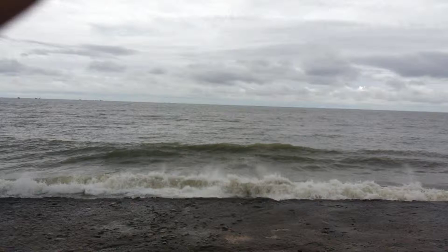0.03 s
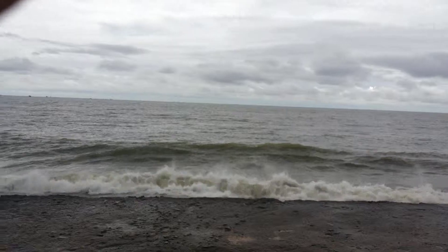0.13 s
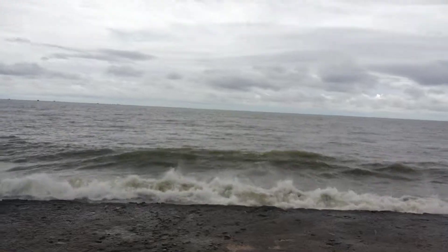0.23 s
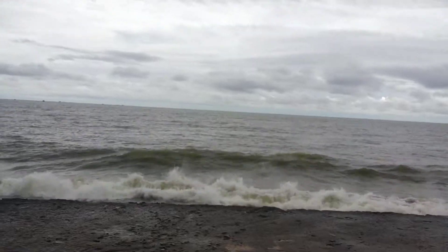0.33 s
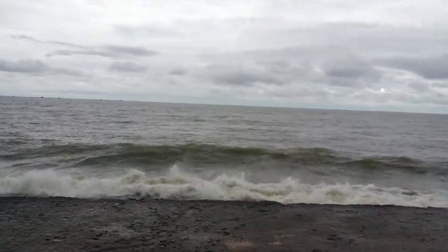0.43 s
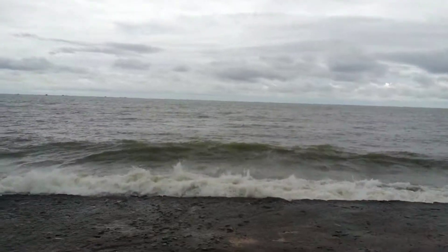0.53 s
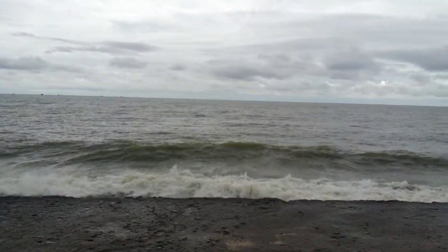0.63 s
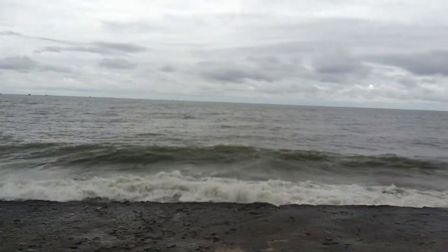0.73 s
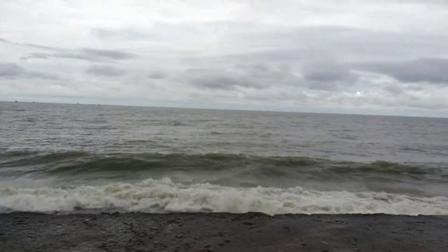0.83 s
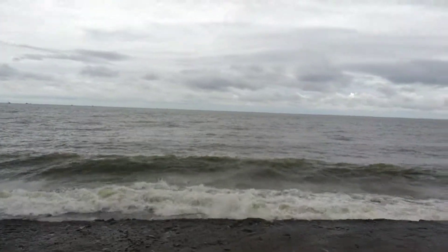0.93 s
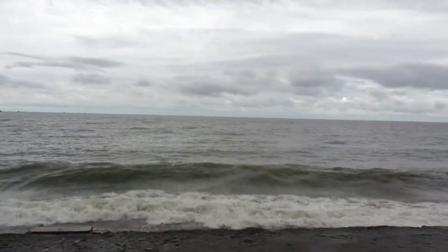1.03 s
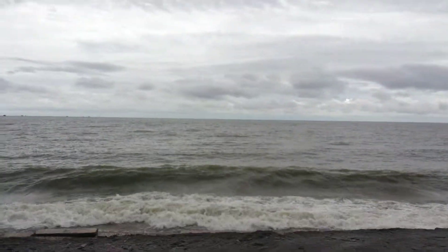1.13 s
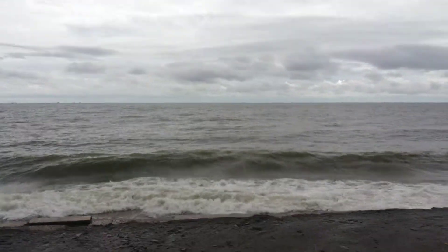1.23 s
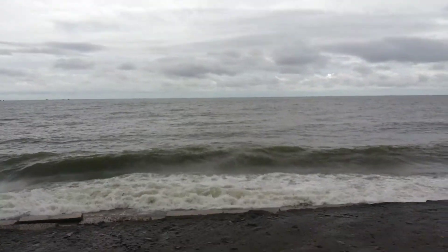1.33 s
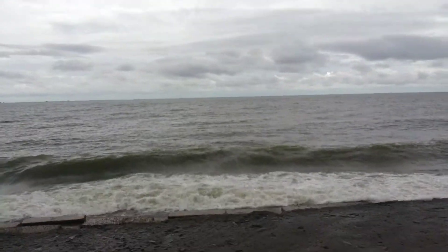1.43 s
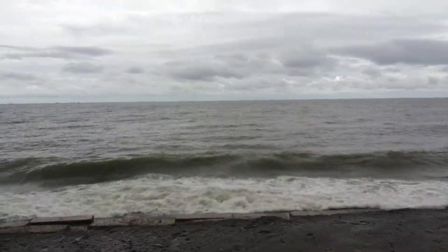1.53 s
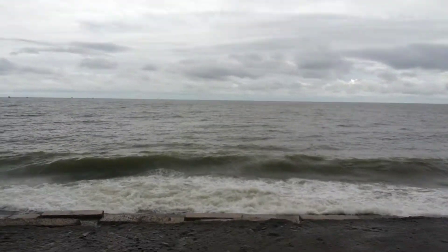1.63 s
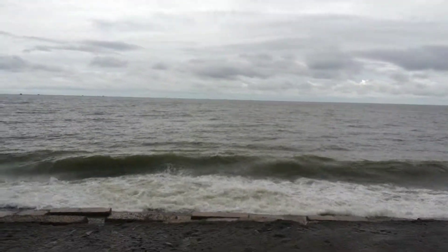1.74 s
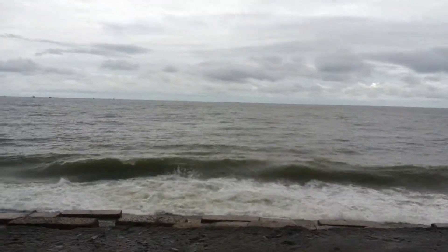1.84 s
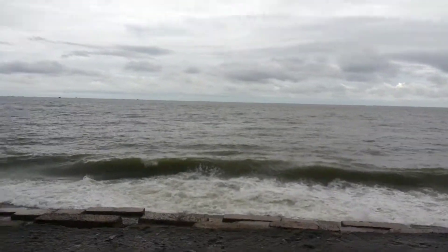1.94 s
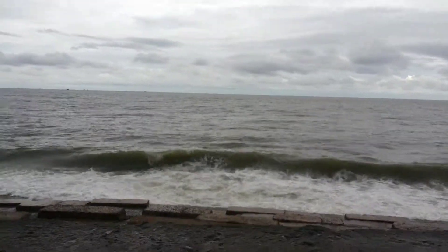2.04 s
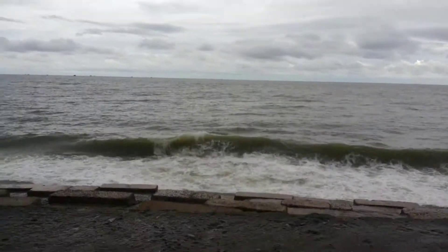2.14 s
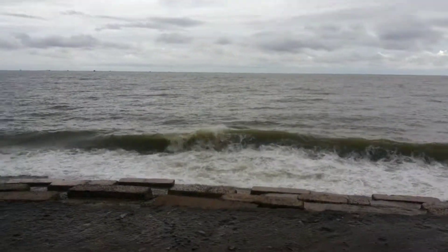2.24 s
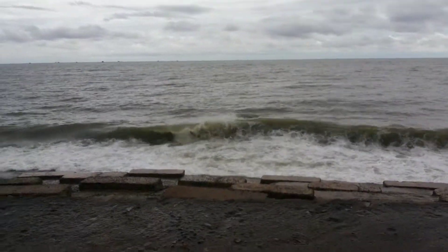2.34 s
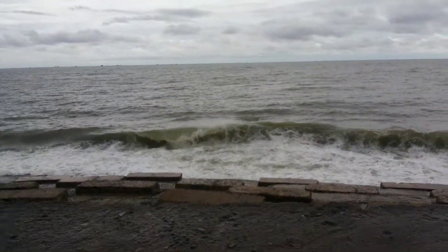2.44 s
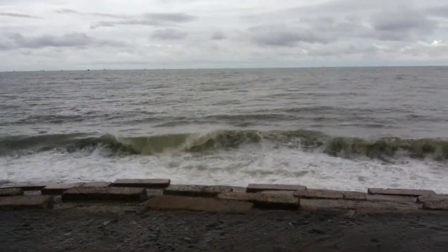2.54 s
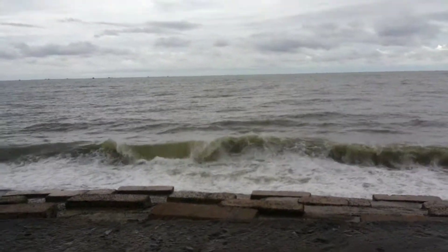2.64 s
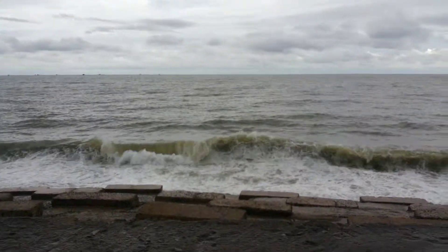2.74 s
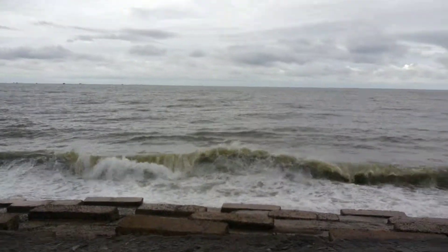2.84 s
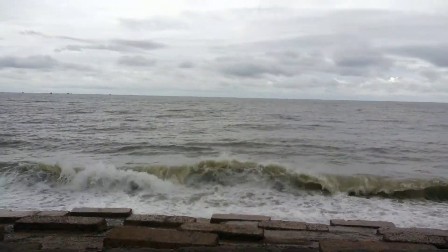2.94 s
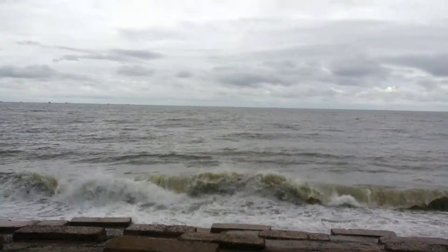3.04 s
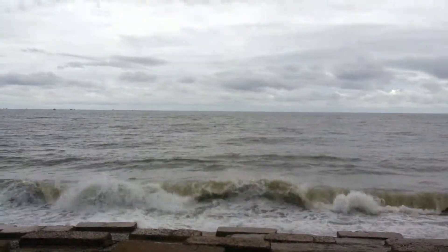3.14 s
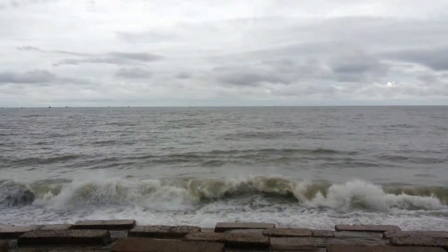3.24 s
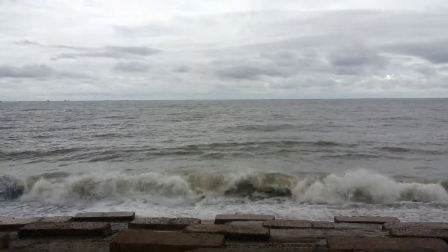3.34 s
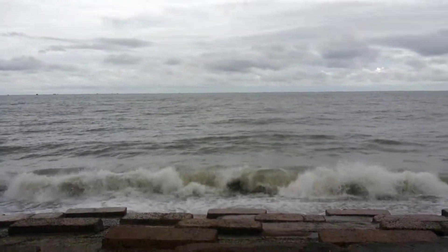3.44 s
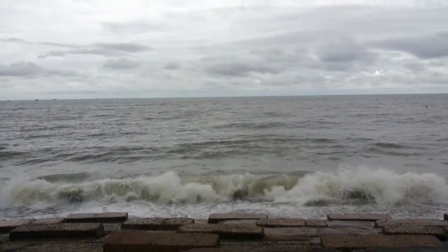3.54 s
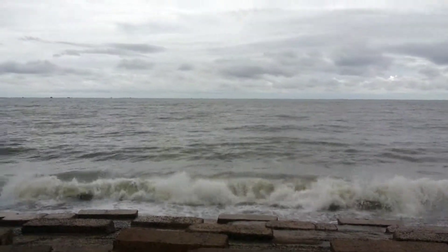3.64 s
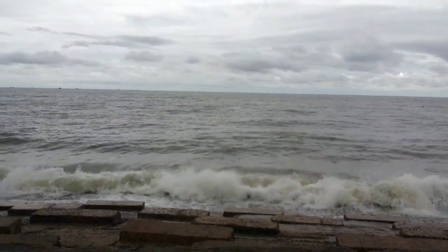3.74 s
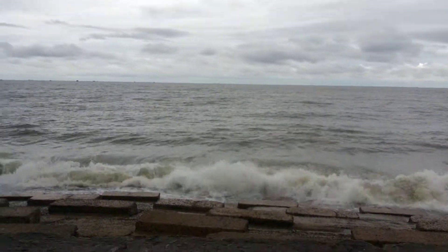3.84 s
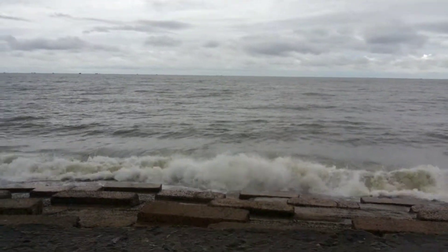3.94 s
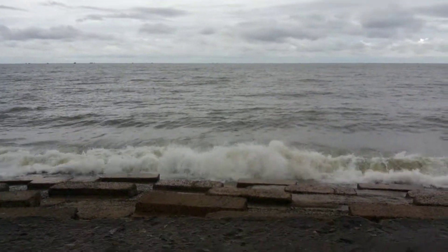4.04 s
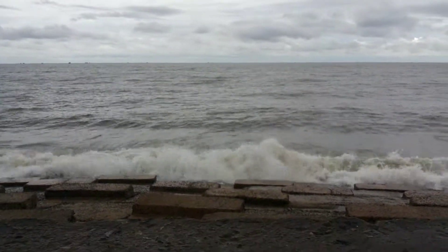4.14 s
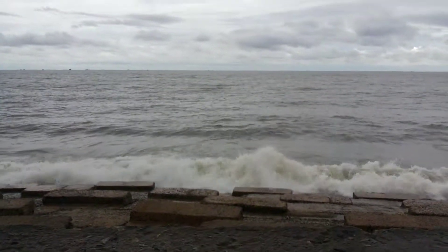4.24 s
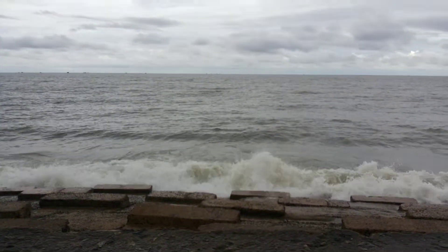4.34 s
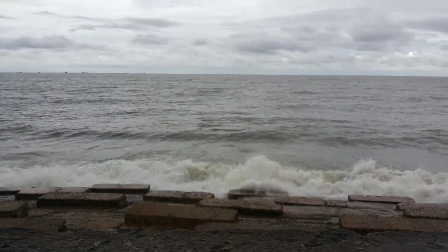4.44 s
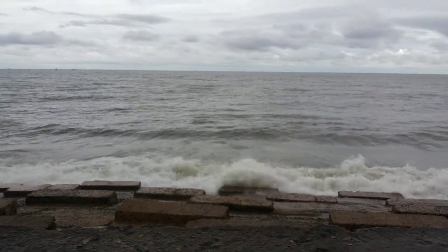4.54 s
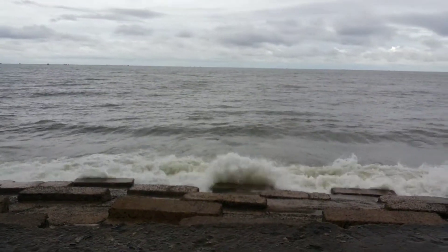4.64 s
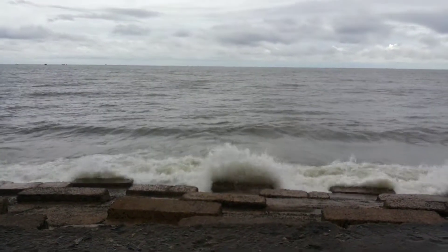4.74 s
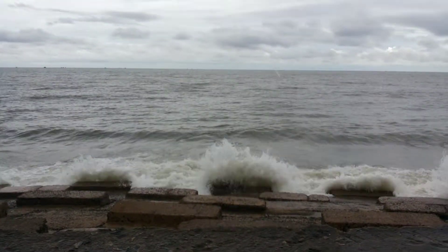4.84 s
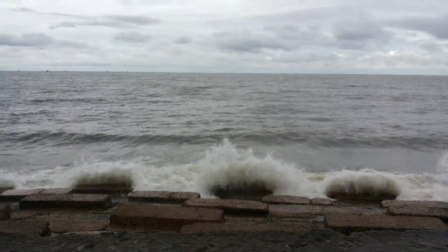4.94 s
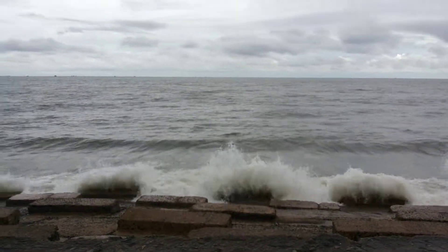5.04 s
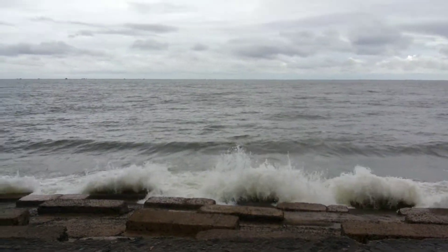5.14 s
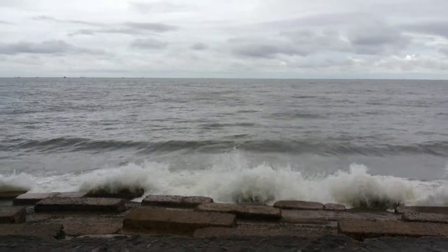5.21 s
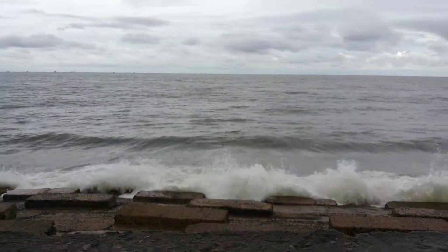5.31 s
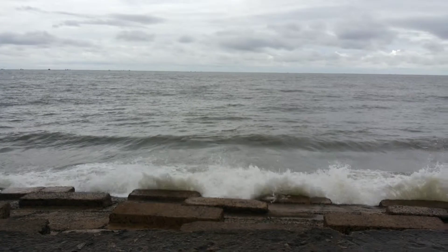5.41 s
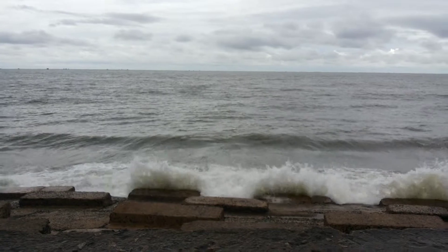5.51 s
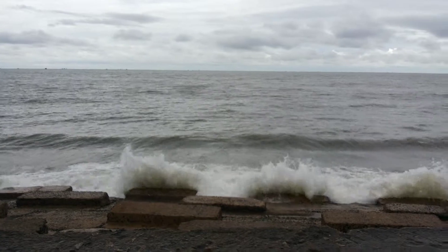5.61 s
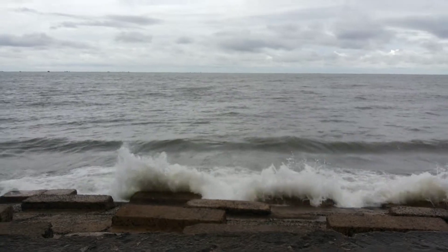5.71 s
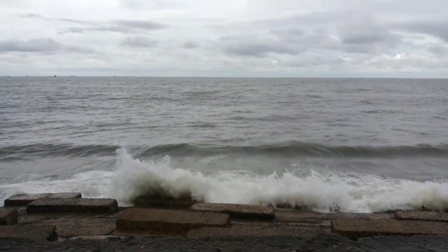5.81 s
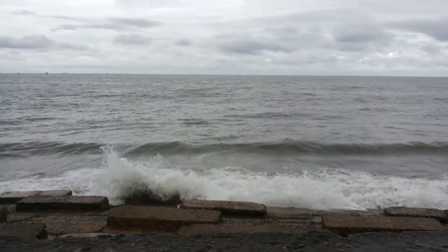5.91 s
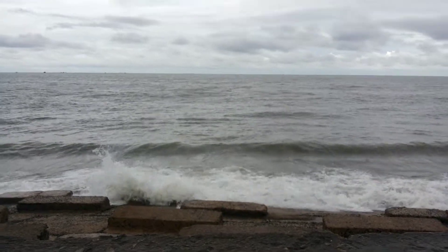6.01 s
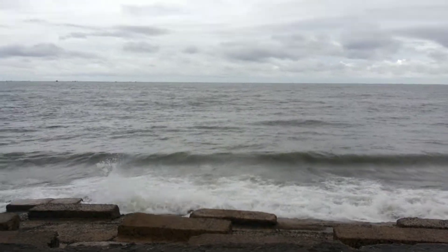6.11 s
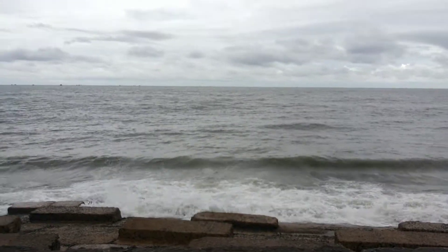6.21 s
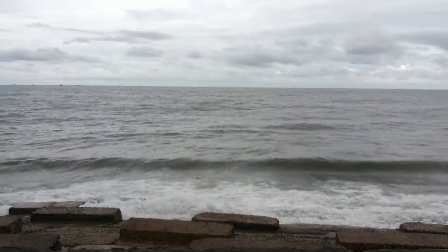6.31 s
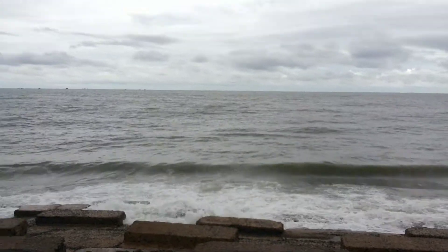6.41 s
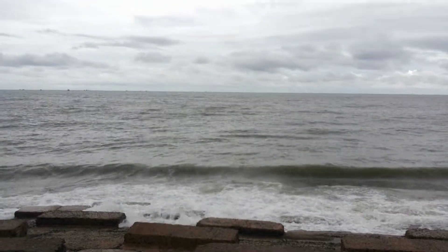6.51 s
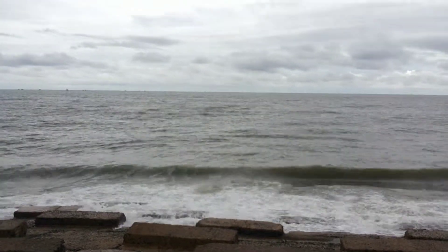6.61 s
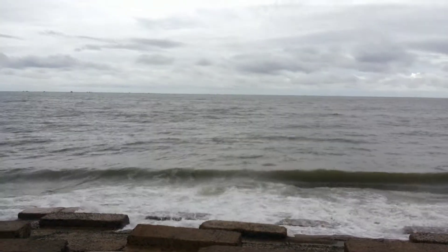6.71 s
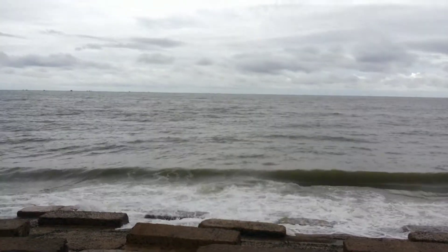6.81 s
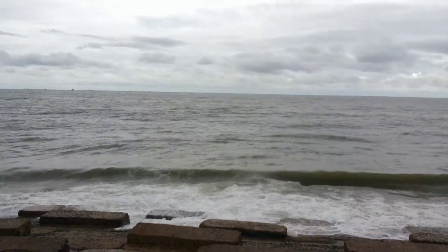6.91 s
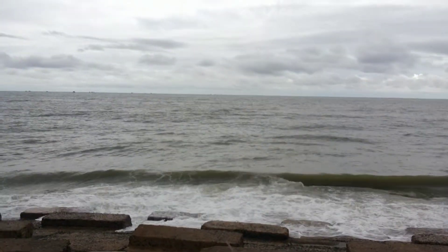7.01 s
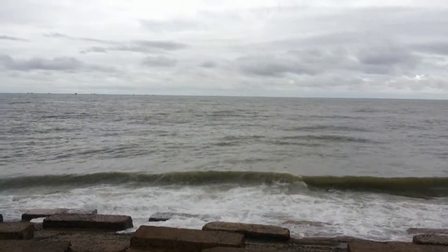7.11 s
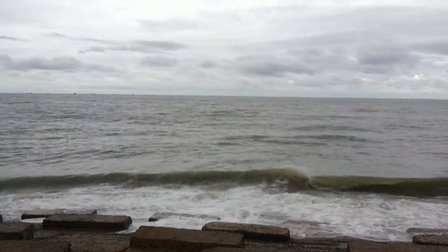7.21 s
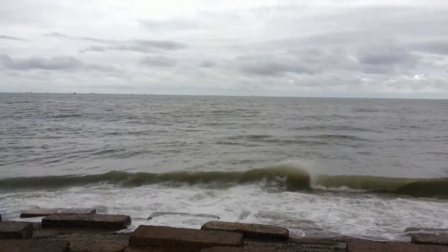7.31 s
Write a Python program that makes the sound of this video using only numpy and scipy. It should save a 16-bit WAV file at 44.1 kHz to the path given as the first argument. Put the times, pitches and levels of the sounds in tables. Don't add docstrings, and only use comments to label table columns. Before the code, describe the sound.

Waves break in foamy washes on stones, wind buffets the microphone with lumpy rumbles and overloaded pops, and a sole scrapes and slaps early on.

```python
import sys
import numpy as np
from scipy import signal
from scipy.fft import rfft, irfft, next_fast_len
from scipy.io import wavfile
from scipy.ndimage import uniform_filter1d, map_coordinates

SR = 44100
rng = np.random.default_rng(int(sys.argv[2]) if len(sys.argv) > 2 else 0)


def boost(x):
    u = np.asarray(x, float) / 20
    return 10 ** u


def transcribe(signal):
    frames = np.atleast_2d(signal).T
    limited = np.clip(frames, -1, 1)
    pcm = np.round(limited * 32767).astype(np.int16)
    wavfile.write(sys.argv[1], SR, pcm)


N = 324576

# t/s, wash level/dB, fizz over wash/dB
SEA = [(0.45, -26, -10.5), (0.9, -27, -6), (1.6, -29, -2.5), (2.3, -28.5, -0.5), (2.65, -29.5, -2.5),
       (3.0, -26, -6.5), (3.5, -22, -10), (4.0, -23, -8), (4.6, -23, -8), (5.0, -26.5, -7.5),
       (5.35, -28, -8.5), (5.8, -27.5, -8.5), (6.4, -28, -8.5), (6.8, -30, -5.5), (7.0, -31, -8.5),
       (7.36, -31, -8.5)]
# t/s, swell/dB, hold/s
SURGES = [(.7, 3.5, 0.083), (1.02, 2, 0.17), (2.3, 0.1, 0.036), (3.085, 3.5, 0.11), (3.3, 2.5, 0.07),
          (3.53, 3, 0.11), (3.77, 3.5, 0.06), (4.05, 1, .14), (4.3, 0.5, 0.093), (4.6, 0.5, 0.11),
          (4.95, 1.5, 0.029), (5.39, 5, 0.23), (5.86, 2.5, 0.15), (6.15, 4.5, 0.052), (6.46, 1, 0.071),
          (6.66, 1, 0.095), (7.12, 0.5, .15)]
# f/Hz, density/dB
ROAR_SPECTRUM = [(40, -41), (100, -11), (200, -6.5), (400, -6.5), (700, -5.5), (1000, -8.5), (1400, -10),
                 (2600, -11.5), (3400, -51)]
# f/Hz, density/dB
WASH_SPECTRUM = [(760, -40), (1300, -3.5), (1920, -6.5), (2170, -2.5), (2570, -1), (2890, 0.5), (3130, -1),
                 (3470, -4), (5510, -14), (7500, -15.5), (9750, -32.5), (16500, -120)]
# f/Hz, density/dB
CREST_SPECTRUM = [(760, -48), (1300, -35), (1690, -7.5), (1970, -6.5), (2530, 1.5), (2790, 1), (4350, -2),
                  (4750, -10.5), (5800, -12), (7500, -15.5), (9750, -65), (16500, -120)]
# f/Hz, density/dB
SPRAY_SPECTRUM = [(2650, -31), (4500, -6), (4730, -2), (5780, -1.5), (7010, -5.5), (8470, -9.5), (9580, -9),
                  (12000, -19), (15600, -48), (22000, -120)]
# f/Hz, density/dB
MIST_SPECTRUM = [(9000, -22), (11000, -3.5), (13000, -9), (14500, -9), (15700, -13), (15900, -100)]
# t/s, level/dB
TURN = [(.5, -8), (1.4, -4), (2.6, -0.3)]

# middle t/s, peak level/dB, length/s
GUSTS = [(0.633, -28, .08), (0.774, -21, .16), (0.886, -22.5, 0.097), (1.09, -22, 0.23),
         (1.272, -25.5, 0.059), (1.49, -27.5, 0.078), (1.806, -17, 0.1), (1.886, -22.5, 0.046),
         (2.045, -21.5, 0.22), (2.342, -28, 0.045), (2.818, -24, 0.13), (3.15, -27.5, 0.16),
         (3.296, -33.5, 0.16), (3.534, -21.5, 0.18), (3.68, -33, 0.27), (3.84, -27.5, 0.21),
         (4.092, -30, 0.33), (4.42, -19.5, .16), (4.682, -25.5, 0.48), (4.976, -22, 0.13),
         (5.553, -20, 0.11), (5.654, -19, 0.16), (5.75, -23, 0.11), (5.915, -18, 0.077), (6.014, -11, 0.14),
         (6.1, -21.5, 0.091), (6.248, -17, 0.21), (6.35, -29, .08), (6.611, -17, .24), (7.111, -28.5, 0.04)]
# f/Hz, density/dB
BUFFET_SPECTRUM = [(15, -56), (25, -18), (188, 3.5), (317, 1), (405, -3), (441, -4), (870, -20),
                   (1600, -21), (2080, -46), (3520, -120)]
# t/s, peak level/dB, pitch f/Hz, length/s
PUFFS = [(.8, -9.5, 325, 0.025), (1.097, -7, 250, 0.0064), (1.147, -13, 316, 0.012),
         (1.172, -14, 347.6, 0.015), (1.79, -14, 250, .035), (1.825, -7, 267, 0.029),
         (.727, -13.5, 301.5, 0.012), (1.987, -20, 263, 0.022), (2.029, -7.5, 296, 0.024),
         (2.103, -16.5, 250, 0.02), (2.33, -17.5, 228, 0.02), (2.774, -12.5, 429, 0.026),
         (3.38, -14, 395, 0.016), (3.509, -8.5, 286.5, 0.0098), (4.405, -12, 313, .008),
         (4.962, -17.5, 250, 0.04), (5.526, -7, 276, 0.011), (5.619, -10, 242, 0.018),
         (5.651, -11, 271, 0.013), (5.682, -10.5, 384.7, 0.045), (5.91, -14, 277.3, 0.087),
         (5.985, -4.5, 300.5, 0.048), (6.03, -7, 270, 0.04), (6.172, -10.5, 331, 0.049),
         (6.214, -8, 264.5, 0.012), (6.25, -11.5, 377, 0.057), (6.469, -13, 238, 0.018),
         (6.52, -13, 276.5, 0.035), (6.6, -20, 302, .035), (6.652, -12.5, 230, 0.024)]
# t/s, peak level/dB, width/s
POPS = [(0.728, -9, 0.00038), (0.789, -16, 0.00082), (1.774, -5, 0.0006), (1.822, -5, 0.00028),
        (2.021, -10, 0.00046), (2.728, -13, 0.0006), (3.476, -9.5, .0007), (5.515, -11, 0.00048),
        (5.621, -8.5, 0.00097), (5.682, -10, 0.00046), (5.923, -8, 0.00061), (5.972, -3, 0.00063),
        (5.989, 0, 0.00029), (6.002, -3, 0.00036), (6.043, 1.5, 0.00047), (6.173, -11, 0.00063),
        (6.217, -10, 0.00093), (6.236, -4, 0.00056), (6.257, 1, 0.00042), (6.274, -2, 0.00045),
        (6.59, -4.5, 0.00053)]

# t/s, scrape level/dB, hold/s, hollow over scrape/dB, fine grit over scrape/dB
RUBS = [
    (1.746, -19.5, 0.027, -20, -5.5),
    (1.8, -23, 0.068, -14, -8),
    (2.03, -25.5, .03, -20, -3),
    (2.065, -20, 0.0086, -19, -7.5),
    (2.115, -21, .02, -15, -10),
    (2.735, -20.5, 0.043, 0, -5.5),
    (2.795, -23.5, 0.061, 0.5, -11.5),
    (2.812, -30, 0.0061, -15, 3.5),
    (2.87, -29, 0.048, -8, -8),
]
# f/Hz, density/dB
GRIT_SPECTRUM = [(1060, -21), (1800, -8), (1900, -12), (2040, -10), (2790, 1.5), (3630, -4.5), (6000, -12),
                 (7800, -42), (13200, -120)]
# f/Hz, density/dB
FINE_SPECTRUM = [(4000, -25), (5500, -2), (7000, 0), (9500, -5), (12000, -19), (14500, -44)]
# f/Hz, width/Hz, level/dB
HOLLOW_MODES = [(671, 46, -2), (1390, 18, 0.5), (1663, 65, 1), (1840, 120, -2)]
# t/s, peak level/dB
SLAPS = [
    (2.736, -3),
]
# f/Hz, level/dB, delay/s, length/s
SOLE_MODES = [(766, 0, 0, 0.016), (1340, 0, 0.0056, 0.0097), (2030, -5, 0.013, 0.0095),
              (2810, -4, 0.012, 0.015), (3270, -12, 0.001, 0.014), (4630, -15, 0.01, .03)]

# f/Hz, width/Hz, level/dB
CASING_DIPS = [(1324, 165, -2.5), (4650, 210, -1), (8100, 330, 0), (11000, 370, -1)]
# t/s, low f/Hz, high f/Hz
STRAY_BANDS = [(.906, 9000, 10500), (.952, 4700, 7000), (.952, 8300, 11900), (1.207, 5200, 6400),
               (1.207, 9700, 11900), (3.251, 13200, 15700), (3.483, 4200, 5300), (3.483, 6900, 9100),
               (3.483, 10400, 11900), (4.319, 11800, 13300), (4.435, 6900, 8400), (4.435, 14500, 15700),
               (4.69, 4700, 5800), (4.69, 8300, 9800), (4.69, 13200, 15300), (5.085, 4200, 9100),
               (5.201, 12500, 14600), (5.433, 4700, 5800), (5.433, 12500, 13900), (5.457, 9700, 11200),
               (5.596, 4700, 5800), (5.596, 11100, 12600), (5.782, 8300, 11200), (5.782, 12500, 13900),
               (6.107, 14500, 15700), (6.618, 6900, 11200), (7.128, 5200, 6400), (7.128, 9000, 10500),
               (7.337, 4200, 8400), (7.337, 12500, 13900)]

SURGE_RISE_S, SURGE_FALL_S = 0.014, 0.14
ROAR_DB, MIST_DB = -2.5, -21.5
ROAR_DB_PER_SURGE_DB, FIZZ_DB_PER_SURGE_DB = 0.86, 0.95
CALM_DB, WIND_DB_PER_SEA_DB = -35, 0.55
GUST_EDGE_DB = 9.5
SHED_EVERY_S, SHED_DB, SHED_SPREAD_DB = 0.026, 1.5, 2.5
SHED_HZ, SHED_S = 250, 0.013
RUB_RISE_S, RUB_FALL_S = 0.0091, 0.042
START_S, TOP_HZ = 0.4355, 15750


def surf():
    sea_db, fizz_db = curves(SEA)
    swell_db = sum(db * held(s, hold_s, SURGE_RISE_S, SURGE_FALL_S) for s, db, hold_s in SURGES)
    wash_db = sea_db + swell_db
    unrest_db = 0.5 * wobble(12) + 0.29 * wobble(22)
    splashes = bursts(count=2500, life_s=0.0028, spread_db=0.5)
    breaking = np.clip((wash_db + 29.5) / 7, 0, 1)

    roar_db = sea_db + ROAR_DB + ROAR_DB_PER_SURGE_DB * swell_db + 1.2 * wobble(8.9)
    roar = boost(roar_db) * rush(ROAR_SPECTRUM, patchy_db=-0.3)
    sheet = np.sqrt(1 - breaking) * rush(WASH_SPECTRUM, patchy_db=1.5, grain=0.17 * splashes)
    crest = np.sqrt(breaking) * rush(CREST_SPECTRUM, patchy_db=1.3, grain=0.28 * splashes)
    spray_db = sea_db + fizz_db + FIZZ_DB_PER_SURGE_DB * swell_db
    spray = boost(spray_db) * rush(SPRAY_SPECTRUM, patchy_db=-1.0, grain=0.19 * splashes)
    mist_db = wash_db + MIST_DB + curves(TURN)[0]
    mist = boost(mist_db) * rush(MIST_SPECTRUM, patchy_db=0.6, grain=0.2 * splashes)
    return boost(unrest_db) * (roar + boost(wash_db - 0.8) * (sheet + crest) + spray + mist)


def wind():
    gust_db = gusts()
    rumble = boost(gust_db + 2.8 * wobble(45) - 1.5) * rush(BUFFET_SPECTRUM, patchy_db=1.0)
    return rumble + eddies(PUFFS + shed(gust_db)) + pops()


def gusts():
    t = np.arange(N) / SR
    calm = boost(CALM_DB + WIND_DB_PER_SEA_DB * (curves(SEA)[0] + 30.5))
    power = calm ** 2
    for s, db, length_s in GUSTS:
        away = np.abs(2 * (t - s) / length_s) ** 3
        power += boost(db - GUST_EDGE_DB * away) ** 2
    return 10 * np.log10(power)


def shed(gust_db):
    slots = np.arange(0.5, N / SR - 0.1, SHED_EVERY_S)
    late, size, pitch, length = rng.standard_normal((len(slots), 4)).T
    s = slots + 0.3 * SHED_EVERY_S * late
    db = gust_db[(s * SR).astype(int)] + SHED_DB + SHED_SPREAD_DB * size
    return list(zip(s, db, SHED_HZ * np.exp(0.17 * pitch), SHED_S * np.exp(0.44 * length)))


def eddies(puffs):
    out = np.zeros(N + SR)
    t = np.arange(-SR // 16, SR // 16) / SR
    tear = rush([(450, 0), (750, -3), (1700, -26.0), (3000, -52)], patchy_db=3.0)
    drift = rng.standard_normal((len(puffs), 2, 32))
    for (s, db, pitch_hz, length_s), knots in zip(puffs, drift):
        shape = np.exp(-np.abs(2.77 * t / length_s) ** 4)
        pace, size = (np.interp(t, np.linspace(t[0], t[-1], num=32), k) for k in knots)
        cycles = np.cumsum(pitch_hz * np.exp(0.322 * np.tanh(pace))) / SR + knots[0, 0]
        push = boost(2.2 * size) * np.sin(2 * np.pi * cycles)
        tear_db = 1.12 * db + (pitch_hz - 300) / 30 - 0.5
        at = round(s * SR) - SR // 16
        rough = boost(tear_db) * np.resize(tear[at:], len(t))
        out[at:at + len(t)] += boost(db - 0.87) * shape * (push + rough)
    return out[:N]


def pops():
    out = np.zeros(N + SR)
    t = np.arange(-SR // 16, SR // 16) / SR
    for s, db, width_s in POPS:
        u = (t - 0.0015) / width_s
        at = round(s * SR) - SR // 16
        out[at:at + len(t)] += boost(db + 2.5) * (1 - u * u) * np.exp(-u * u / 2)
    return out[:N]


def sandal():
    return rubs() + slap()


def rubs():
    grains = 0.45 * bursts(count=5000, life_s=0.003, spread_db=2)
    scrape = rush(GRIT_SPECTRUM, patchy_db=3.0, grain=grains)
    fine = rush(FINE_SPECTRUM, patchy_db=3.0, grain=grains)
    tones = sum(boost(db) * wavering(hz, blur=width_hz / 45) for hz, width_hz, db in HOLLOW_MODES)
    broad_modes = [(hz, 4 * width_hz, db) for hz, width_hz, db in HOLLOW_MODES]
    breath = resonant(rng.standard_normal(N), broad_modes)
    hollow = unit(unit(tones) + unit(breath))
    out = np.zeros(N)
    for s, scrape_db, hold_s, hollow_db, fine_db in RUBS:
        contact = boost(scrape_db) * held(s, hold_s, RUB_RISE_S, RUB_FALL_S)
        out += contact * (scrape + boost(hollow_db) * hollow + boost(fine_db) * fine)
    return out


def slap():
    out = np.zeros(N)
    smack = rush([(400, -30), (700, 4.0), (3300, -1.0), (5000, -33.0)], patchy_db=5.0)
    for s, db in SLAPS:
        for hz, level_db, delay_s, length_s in SOLE_MODES:
            u = (np.arange(N) / SR - s - delay_s) / length_s
            attack = np.sin(np.clip(9 * u, 0, 1) * np.pi / 2) ** 2
            decay = boost(-14 * np.clip(u, 0, 9) ** 3)
            ring = wavering(hz, blur=0.72) + 0.35 * smack
            out += boost(db + level_db - 7) * attack * decay * ring
    return out


def wavering(hz, blur):
    phase = 2 * np.pi * hz * np.arange(N) / SR + blur * wobble(70)
    return boost(1.2 * wobble(60)) * np.sin(phase)


def rush(spectrum, patchy_db, grain=0):
    z = signal.stft(rng.standard_normal(N) + grain, nperseg=512)[2]
    field = uniform_filter1d(rng.standard_normal(z.shape), size=6, axis=0)
    field = uniform_filter1d(field, size=10, axis=1)
    patched = signal.istft(z * boost(patchy_db * unit(field)), nperseg=512)[1][:N]
    return unit(filtered(patched, lambda hz: boost(along(spectrum, hz))))


def bursts(count, life_s, spread_db):
    when, size = rng.random((count, 2)).T
    sizes = boost(-spread_db * np.log(1 - size))
    starts = np.bincount((when * N).astype(int), sizes, N)
    envelope = signal.lfilter([1], [1, -np.exp(-1 / (life_s * SR))], starts)
    return unit(envelope * rng.standard_normal(N))


def held(s, hold_s, rise_s, fall_s):
    return np.interp(np.arange(N) / SR, s + np.cumsum([0, rise_s, hold_s, fall_s]), [0, 1, 1, 0])


def curves(rows):
    s, *cols = np.transpose(rows)
    return [np.interp(np.arange(N) / SR, s, c) for c in cols]


def wobble(rate_hz):
    knots = rng.standard_normal(int(N * rate_hz / SR) + 4)
    return map_coordinates(knots, [np.arange(N) * rate_hz / SR])


def unit(x):
    return x / np.sqrt(np.mean(x ** 2) + 1e-20)


def along(points, hz):
    f, v = np.transpose(points)
    return np.interp(np.log(hz + 1), np.log(f + 1), v)


def filtered(x, response):
    m = next_fast_len(len(x) + SR // 2)
    return irfft(rfft(x, m) * response(np.fft.rfftfreq(m, 1 / SR)), m)[:len(x)]


def resonant(x, modes):
    def response(f):
        return sum((-1) ** k * boost(db) * 1j * f * w / (c * c - f * f + 1j * f * w)
                   for k, (c, w, db) in enumerate(modes))
    return filtered(x, response)


def scene():
    return np.tile(surf() + wind() + sandal(), (2, 1))


def port(x):
    def response(hz):
        casing_db = sum(db * np.exp(-((hz - c) / w) ** 2) for c, w, db in CASING_DIPS)
        return (1j * hz / (1j * hz + 45)) ** 2 * boost(casing_db)
    return filtered(x, response)


def faint_top_dropped(x, from_hz, least_db):
    hz, _, z = signal.stft(x, SR, nperseg=2048)
    level = uniform_filter1d(np.abs(z), size=6, axis=0)
    kept = ((level > boost(least_db)) | (hz[:, None] < from_hz)) & (hz[:, None] < TOP_HZ)
    return signal.istft(z * kept, SR, nperseg=2048)[1][:N]


def stray_side(x):
    side = np.zeros(N + 2048)
    window = np.pad(signal.windows.tukey(1152, 0.25), 448)
    for s, low_hz, high_hz in STRAY_BANDS:
        at = round(s * SR) - 1024
        earlier = x[at - 2048:at]
        side[at:at + 2048] += window * filtered(earlier, lambda hz: (hz > low_hz) & (hz < high_hz))
    return boost(-3.0) * side[:N]


def roll_off(x):
    return signal.sosfilt(signal.butter(12, 16500, fs=SR, output="sos"), x)


def record(dry):
    thin = port(dry[0])
    saturated = thin / (1 + np.abs(thin / 0.74) ** 6) ** (1 / 6)
    no_sub = filtered(saturated, lambda hz: hz > 36)
    mono = faint_top_dropped(no_sub, from_hz=12500, least_db=-82.5)
    mono = mono * (np.arange(N) / SR > START_S)
    side = stray_side(mono)
    return roll_off(np.array([mono + side, mono - side]))


dry = scene()
out = record(dry)
transcribe(out)
```